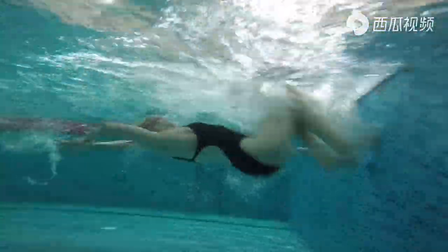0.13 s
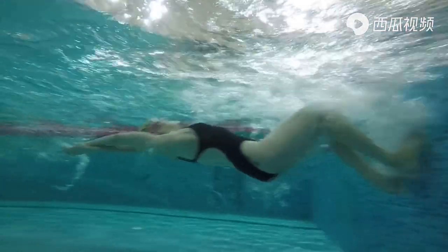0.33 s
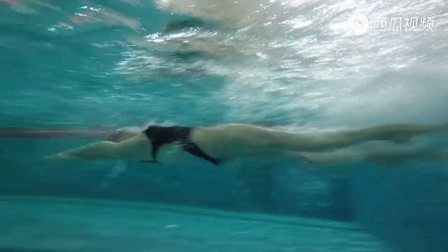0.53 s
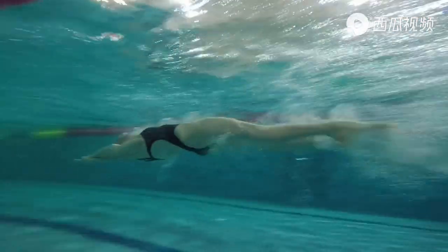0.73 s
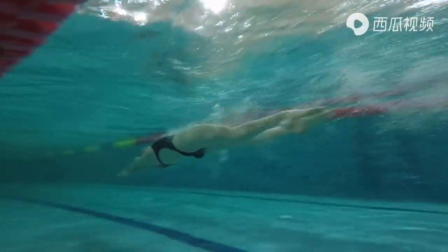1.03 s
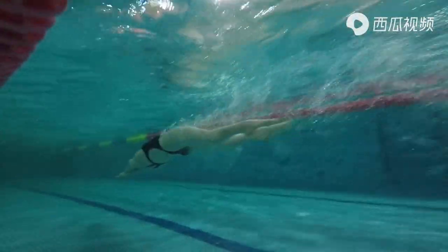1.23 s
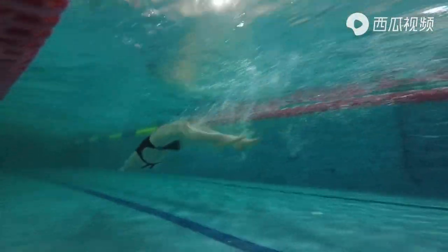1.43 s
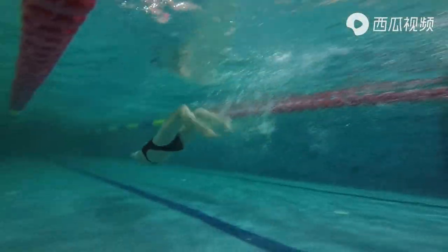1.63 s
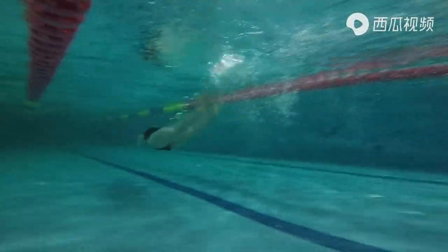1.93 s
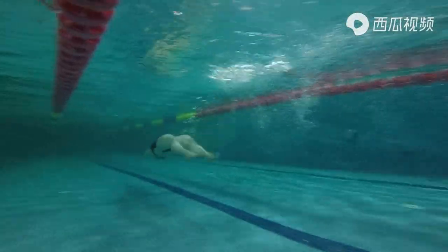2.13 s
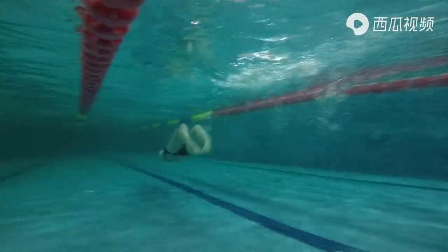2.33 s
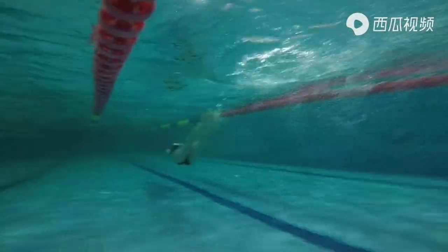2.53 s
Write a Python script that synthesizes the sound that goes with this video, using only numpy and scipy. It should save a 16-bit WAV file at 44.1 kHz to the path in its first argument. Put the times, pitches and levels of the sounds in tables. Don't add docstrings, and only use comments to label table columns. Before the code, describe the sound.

Muffled churning of bubbles underwater in a pool, deep glugs first, then a higher gurgling stream.

```python
import sys
import numpy as np
from scipy import signal
from scipy.fft import rfft, irfft
from scipy.io import wavfile
from scipy.ndimage import uniform_filter1d

SR = 44100
rng = np.random.default_rng(int(sys.argv[2]) if len(sys.argv) > 2 else 0)


def unload_audio(sound):
    columns = np.transpose(np.atleast_2d(sound))
    steps = np.round(np.clip(columns, -1, 1) * 32767)
    wavfile.write(sys.argv[1], SR, steps.astype(np.int16))


def boost(x):
    u = np.asarray(x, float) / 20
    return 10 ** u


N = 119070

# start_s, level_db
FIZZ_LEVEL = [(0, -77), (.3, -79.5), (.41, -80.5), (.47, -72), (.54, -81.5), (.9, -78.5), (1.43, -74.5),
              (1.7, -70.5), (2.15, -73.5), (2.42, -71), (2.7, -73.5)]


def rms_one(x):
    return x / np.sqrt(np.mean(x ** 2) + 1e-20)


def in_time(rows):
    s, *columns = np.transpose(rows)
    return [np.interp(np.arange(N) / SR, s, c) for c in columns]


def add(out, s, x):
    i = max(int(s * SR), 0)
    out[i:i + len(x)] += x[:max(len(out) - i, 0)]


def filtered(x, order, hz, kind="band"):
    return signal.sosfilt(signal.butter(order, hz, kind, fs=SR, output="sos"), x)


def drift(rate):
    every = 40
    r = np.exp(-2 * np.pi * every * rate / SR)
    white = rng.standard_normal(N // every + 2002)
    slow = signal.lfilter([1], [1, -2 * r, r * r], white)[2000:]
    return np.interp(np.arange(N) / every, np.arange(len(slow)), rms_one(slow))


def banded_noise(colour, patchy_db, rate):
    edges = 70 * 2 ** np.arange(0, 7.9, 1 / 3)
    together = drift(rate)
    white = rng.standard_normal((2, N))
    out = 0
    for k, (low, high) in enumerate(zip(edges, edges[1:])):
        flicker = boost(patchy_db * (0.5 * together + drift(rate)))
        out = out + flicker * filtered(white[k % 2], 2, [low, high])
    hz, db = np.transpose(colour)
    log_hz = np.log(np.arange(N // 2 + 1) * SR / N + 1)
    gain = boost(np.interp(log_hz, np.log(hz), db, left=-90, right=-90))
    return rms_one(irfft(rfft(out) * gain, N))


def bubble(hz, length, rise, attack, squeeze, phase):
    u = np.arange(int(2 * length * SR)) / (length * SR)
    turn = 2 * np.pi * hz * length * ((1 - rise / 2) * u + rise * u * u / 2) + phase
    swell = np.sin(np.pi / 2 * np.minimum(u / np.clip(attack, 0.02, 0.9), 1)) ** 2
    shape = swell * np.exp(-3.0 * np.maximum(u - attack, 0) ** 2)
    return shape * (np.cos(turn) + squeeze * shape * np.cos(2 * turn))


def cloud(rows, spread, cycles, rise, count):
    level_db, centre_hz = in_time(rows)
    out = np.zeros(N)
    chances = rng.random((count, 3))
    detune = np.clip(rng.standard_normal(count), -1.5, 1.5)
    for k, (late, size, phase) in enumerate(chances):
        s = (k + late) / count * N / SR
        hz = centre_hz[int(s * SR)] * 2 ** (spread * detune[k])
        loudness = boost(-2.5 * np.log(size + 0.01))
        add(out, s, loudness * bubble(hz, cycles / hz / 2, rise, 0.29, 0, 2 * np.pi * phase))
    running_rms = np.sqrt(uniform_filter1d(out ** 2, size=4000) + 1e-12)
    return boost(level_db) * out / running_rms


def pockets(rows, trim_db, attack, squeeze):
    out = np.zeros(N)
    for s, db, hz, length in rows:
        phase = -2 * np.pi * hz * length * attack
        add(out, s, boost(db + trim_db) * bubble(hz, length, 0.06, attack, squeeze, phase))
    return out


def wake():
    # start_s, level_db, pitch_hz
    wake_rows = [(.06, -34, 149), (.15, -24, 119), (.28, -36, 117), (.39, -26.5, 123), (.6, -39, 130.7),
                 (.76, -30, 146), (.84, -49, 109), (1.0, -31.5, 133.6), (1.2, -62.5, 131),
                 (1.38, -36.5, 118), (1.44, -43, 137), (1.61, -48, 149), (1.7, -35, 150), (2.1, -54.5, 161),
                 (2.39, -44, 134.5), (2.5, -49, 116), (2.64, -31, 131), (2.7, -54, 119)]
    return boost(-1.5) * cloud(wake_rows, spread=0.31, cycles=5, rise=0.15, count=250)


def glugs():
    # start_s, peak_db, pitch_hz, length_s
    glug_rows = [(.1, -17, 129.4, 0.026), (.16, -16.5, 120, 0.029), (.245, -20.5, 111, 0.031),
                 (.33, -20.5, 110.6, 0.028), (.194, -12.5, 46, 0.035), (.375, -17.5, 114, 0.047),
                 (.4, -29, 86, 0.044), (.732, -22.5, 174.4, 0.042), (.844, -14, 115.6, 0.024),
                 (1.349, -23, 324, 0.024), (1.375, -24, 260, 0.018), (1.376, -23, 124, 0.032),
                 (1.475, -15, 200, 0.0094), (1.487, -17, 148, 0.0178), (1.519, -15, 139, 0.0155),
                 (1.556, -11.5, 131, 0.022), (1.622, -14, 103, 0.0135), (1.641, -16, 119, 0.021),
                 (1.655, -22.5, 162, 0.045), (1.71, -24, 158.8, 0.093), (1.765, -20, 71, 0.02),
                 (1.86, -25.5, 30.6, 0.071), (2.505, -25.5, 29.8, 0.048), (2.375, -24.5, 138, 0.0243),
                 (2.195, -20.5, 78, 0.027), (2.6, -20, 60.7, 0.032)]
    return pockets(glug_rows, trim_db=-5.5, attack=0.3, squeeze=0.22)


def foam():
    # start_s, level_db
    foam_rows = [(0, -30), (0.191, -29.5), (0.281, -37.5), (0.351, -31), (.43, -31), (.5, -26),
                 (0.558, -32), (.86, -38), (.89, -50.5), (.97, -38.5), (1.15, -56), (1.33, -42),
                 (1.38, -34.5), (1.429, -63), (1.601, -47), (2.0, -61.5), (2.7, -58.5)]
    pitched = [(s, db, 265.8) for s, db in foam_rows]
    return boost(-2.0) * cloud(pitched, spread=0.24, cycles=7.1, rise=0.095, count=250)


def stream():
    # start_s, level_db, pitch_hz
    stream_rows = [(0, -44.5, 385), (.46, -38.5, 410), (.8, -60.5, 479), (1.0, -43.5, 599),
                   (1.3, -42.5, 450), (1.37, -28.5, 476), (1.45, -38.5, 390), (1.79, -37.5, 450),
                   (1.95, -40.5, 515), (2.0, -28, 439), (2.15, -24, 506), (2.28, -31.5, 424),
                   (2.35, -38, 437), (2.41, -29.5, 470), (2.5, -40.5, 498), (2.59, -32, 417),
                   (2.7, -43.5, 417)]
    return boost(-5.5) * cloud(stream_rows, spread=0.17, cycles=11, rise=0.092, count=460)


def plops():
    # start_s, peak_db, pitch_hz, length_s
    stream_plops = [(.47, -16.5, 293.3, 0.0605), (1.41, -36.5, 1147, 0.02), (1.552, -24.5, 624, .04),
                    (1.558, -35, 1040, 0.02), (1.77, -26, 505, 0.038), (1.921, -21.5, 541, 0.034),
                    (1.989, -18.5, 447, 0.023), (2.02, -40, 767, 0.095), (2.053, -17.5, 424, 0.031),
                    (2.118, -17, 562, 0.061), (2.155, -18, 398.5, 0.042), (1.974, -22, 435, 0.012),
                    (2.022, -18.5, 428, 0.024), (2.068, -20, 409, 0.026), (2.09, -20.5, 441, 0.03),
                    (2.172, -22.5, 454, 0.026), (2.2, -33.5, 485, 0.023), (2.232, -25, 500, 0.027),
                    (2.25, -16.5, 415, 0.025), (2.275, -24.5, 454, 0.023), (2.303, -25, 449, 0.033),
                    (2.42, -21, 547, 0.019), (2.575, -20.5, 385, 0.04), (2.612, -25, 413, .04),
                    (2.338, -30.5, 745, .04), (2.372, -19, 450, 0.029), (2.405, -15, 527, 0.031),
                    (2.452, -21.5, 577, .03), (2.542, -25.5, 363, .06)]
    # start_s, peak_db, pitch_hz, length_s
    foam_plops = [(0.036, -25.5, 270, 0.037), (0.072, -29, 280, 0.021), (0.142, -13.5, 245, 0.023),
                  (0.178, -16, 262.4, 0.028), (.215, -22.5, 213, 0.031), (0.237, -21, 283, .028),
                  (.244, -29, 543, 0.023), (.337, -19.5, 306, 0.042), (.35, -28.5, 547, 0.022),
                  (0.387, -28, 434, 0.024), (0.426, -29, 228, 0.021), (0.463, -22.5, 422, .02),
                  (0.512, -17, 305, .03), (0.645, -22.5, 261, 0.041), (0.702, -24, 275, 0.019),
                  (.743, -21.5, 200, 0.011), (.84, -24, 296, 0.016), (.97, -26.5, 212, 0.036),
                  (1.029, -32.5, 553, 0.0174), (1.14, -39, 203, 0.027), (1.1, -32.5, 534, 0.027),
                  (1.18, -35.5, 533, .02), (1.218, -34, 532, 0.026), (1.311, -33, 470, 0.022),
                  (1.351, -22.5, 455, 0.015), (1.374, -25, 542, 0.031), (1.387, -24, 340, 0.012),
                  (1.699, -34.5, 890, 0.0208), (1.613, -46, 441, 0.015), (1.67, -28, 165, 0.034)]
    out = np.zeros(N)
    for rows in (stream_plops, foam_plops):
        out += pockets(rows, trim_db=-7.5, attack=0.1538, squeeze=0)
    return out


def surge():
    # start_s, level_db
    surge_rows = [(0, -32.5), (.04, -35), (.08, -43), (.12, -34), (.21, -29), (.25, -47), (.55, -41.5),
                  (.63, -34.5), (.85, -38.5), (.89, -35.5), (1.04, -46), (1.09, -36), (1.27, -42),
                  (1.8, -40), (1.93, -41.5), (2.3, -37.5), (2.59, -33), (2.7, -43.5)]
    low = filtered(rng.standard_normal(N + SR), 2, [14, 42.3])[SR:]
    low = low / np.sqrt(uniform_filter1d(low ** 2, size=3500))
    return boost(in_time(surge_rows)[0] + 2.5) * low


def ticks():
    # start_s, peak_db, pitch_hz, crack_db (beside the ring)
    tick_rows = [(0.349, -66, 2870, -3.5), (0.641, -55.5, 3490, -6.5), (.67, -57.5, 2700, -1.5),
                 (.726, -60, 4740, -2), (.724, -52, 1450, -11), (.727, -68, 6500, 0), (.748, -55, 1560, -9),
                 (.6, -67.5, 5800, -3), (.68, -66.5, 5230, -1), (1.018, -68, 7060, 1),
                 (2.03, -49, 1660, -12), (2.305, -50, 1710, -18), (.755, -65, 13300, -2.5),
                 (1.419, -53.5, 7500, -4), (1.434, -63, 10000, -6), (1.569, -47.5, 3050, -9),
                 (1.688, -34, 1030, -33), (1.714, -48, 1840, -12), (1.884, -48.5, 8600, -9),
                 (.028, -61, 3670, -18), (2.155, -40.5, 7010, -14.5), (2.193, -57.5, 8500, -3),
                 (2.338, -56, 7960, -9), (2.394, -58, 7470, 7), (2.596, -57, 5950, 5.5)]
    out, t = np.zeros(N), np.arange(1200) / SR
    for s, db, hz, crack_db in tick_rows:
        noise = filtered(rng.standard_normal(1200), 2, [hz * 0.39, min(hz * 1.3, 14000)])
        crack = boost(crack_db) * rms_one(noise) * np.exp(-t / 0.0013)
        decay = boost(-60 * t * np.sqrt(hz * 4000) / 67)
        ring = np.sin(2 * np.pi * hz * t) * decay * np.minimum(t / 0.0013, 1)
        add(out, s, boost(db) * (ring + crack))
    return out


def wash():
    # start_s, level_db
    wash_rows = [(0, -59.5), (.25, -61), (.64, -60), (.85, -62), (1.3, -57.5), (1.45, -53), (1.85, -54),
                 (2.101, -56), (2.3, -52.5), (2.55, -53), (2.7, -55)]
    # pitch_hz, level_db (per Hz)
    wash_colour = [(150, -34.5), (330, -11), (550, -1), (800, -13), (1150, -21.5), (1350, -30), (1750, -28),
                   (2100, -41), (3400, -60.5)]
    splash = boost(in_time(wash_rows)[0] + 9) * banded_noise(wash_colour, patchy_db=1.8, rate=12)
    pitched = [(s, db - 1, 802.4) for s, db in wash_rows]
    return splash + cloud(pitched, spread=0.31, cycles=18, rise=0.092, count=420)


def fizz():
    # pitch_hz, level_db (per Hz)
    fizz_colour = [(1900, -1.5), (3050, 1.5), (3500, -4), (5200, -4), (7000, -5.5), (9000, -5.5),
                   (12000, -16), (14200, -22)]
    return boost(in_time(FIZZ_LEVEL)[0] + 2.5) * banded_noise(fizz_colour, patchy_db=2.0, rate=85)


def spray():
    # start_s, level_db
    spray_rows = [
        (0, -65.5),
        (.3, -71),
        (.47, -67.5),
        (.6, -70.5),
        (.95, -78),
        (1.4, -87),
        (1.86, -72.5),
        (2.14, -75.5),
        (2.7, -74.5),
    ]
    sparkles_per_s = 38 * boost(in_time(FIZZ_LEVEL)[0] + 74)
    struck = rng.random(N) < sparkles_per_s / SR
    sparks = boost(10) * 3 * struck * rng.standard_normal(N)
    band = filtered(rng.standard_normal(N) + sparks, 2, [8140, 10200])
    mist = filtered(rng.standard_normal(N), 2, 11500, "high")
    return boost(in_time(spray_rows)[0] - 6.0) * (rms_one(band) + boost(-7.5 + 3.0 * drift(6)) * mist)


def scene():
    bubbles = wake() + glugs() + foam() + stream() + plops()
    background = surge() + ticks() + wash() + fizz() + spray()
    return (bubbles + background)[None]


def low_pass(x):
    return signal.sosfilt(signal.butter(12, 14250, fs=SR, output="sos"), x)


def record(dry):
    top = 0.53
    mix = top * np.tanh(dry / top)
    return low_pass(mix)


dry = scene()
out = record(dry)
unload_audio(out)
```